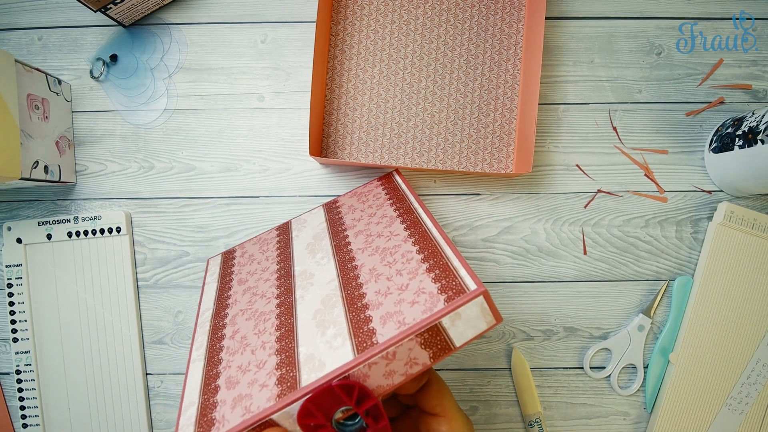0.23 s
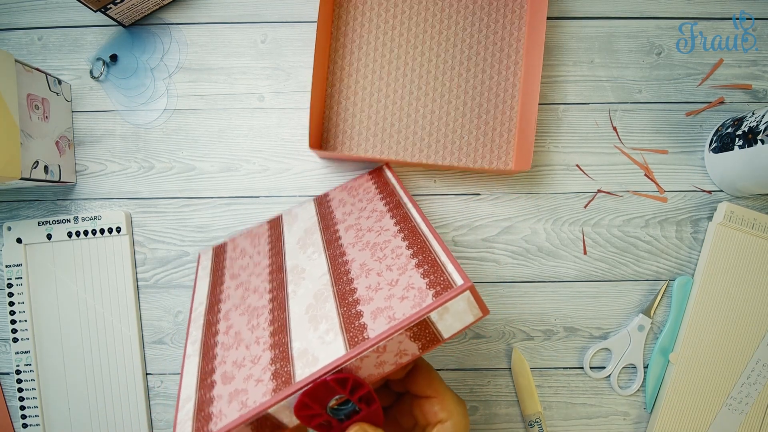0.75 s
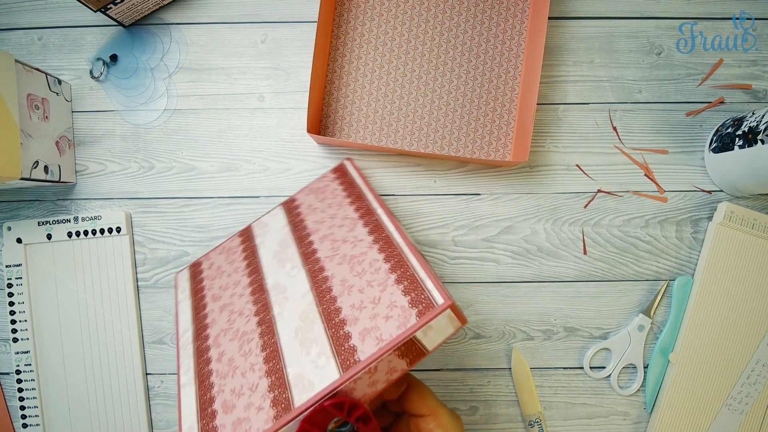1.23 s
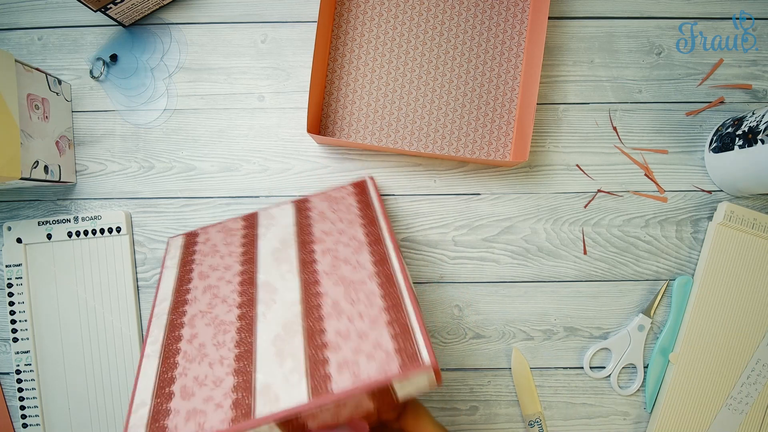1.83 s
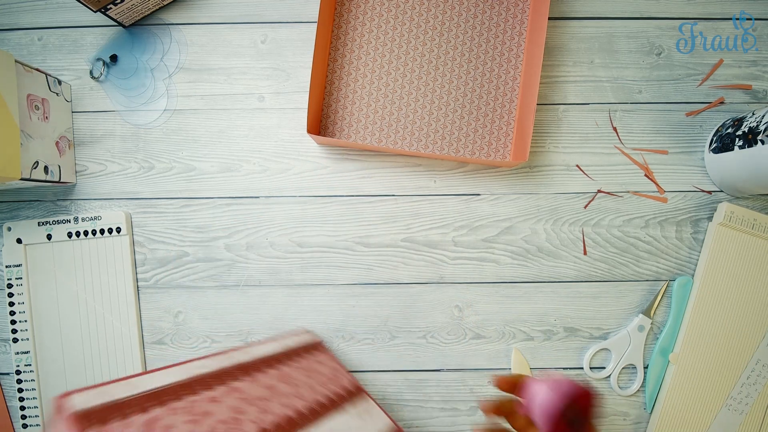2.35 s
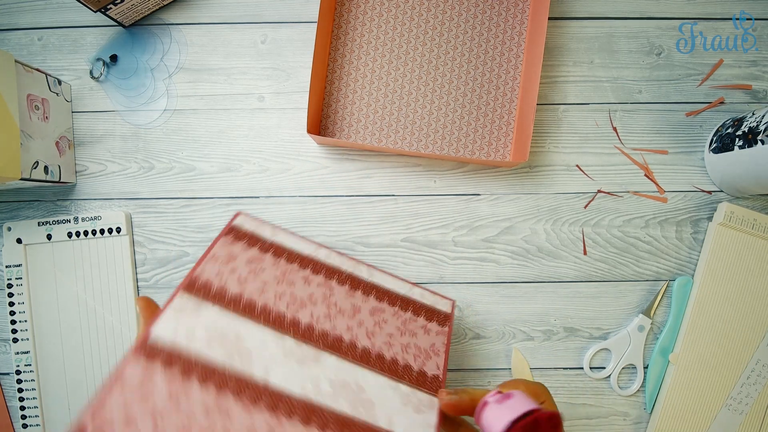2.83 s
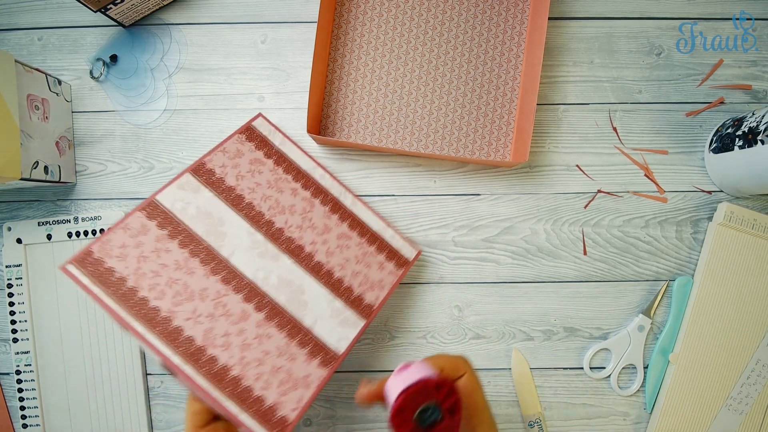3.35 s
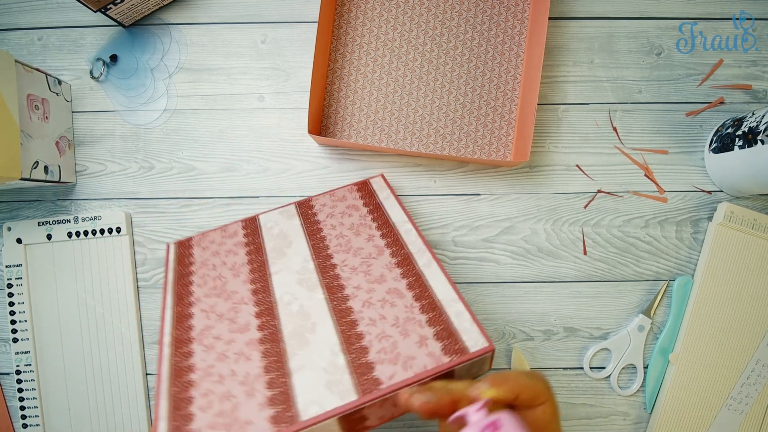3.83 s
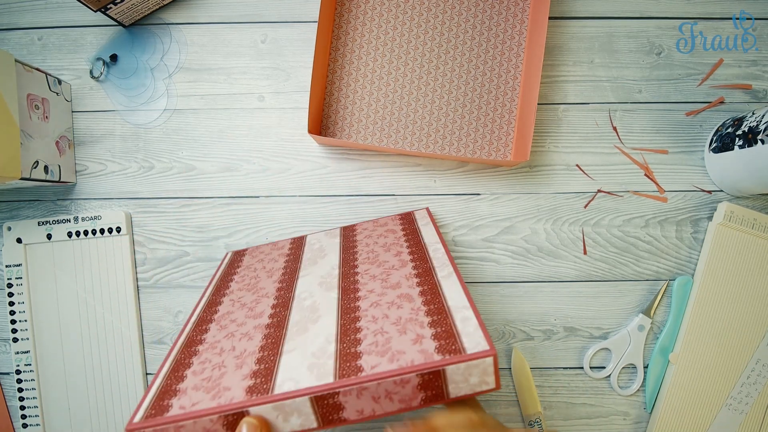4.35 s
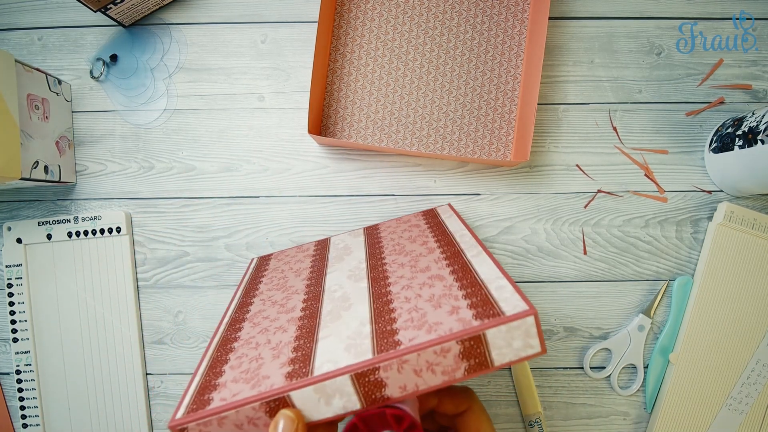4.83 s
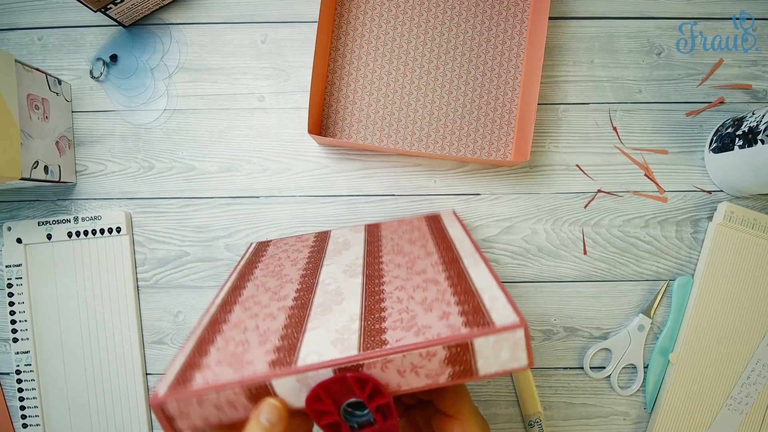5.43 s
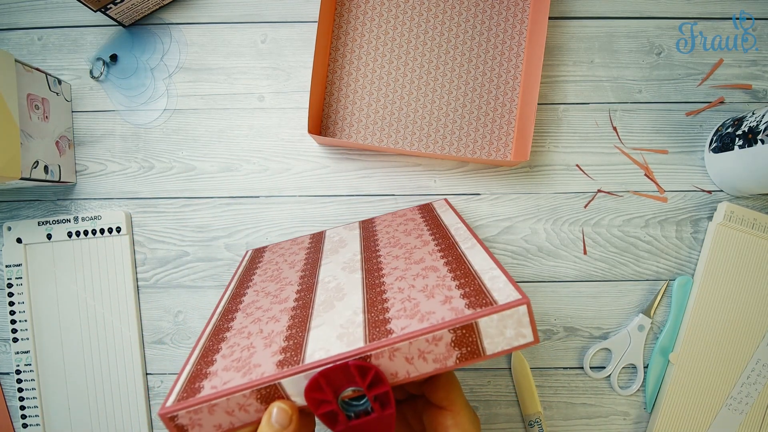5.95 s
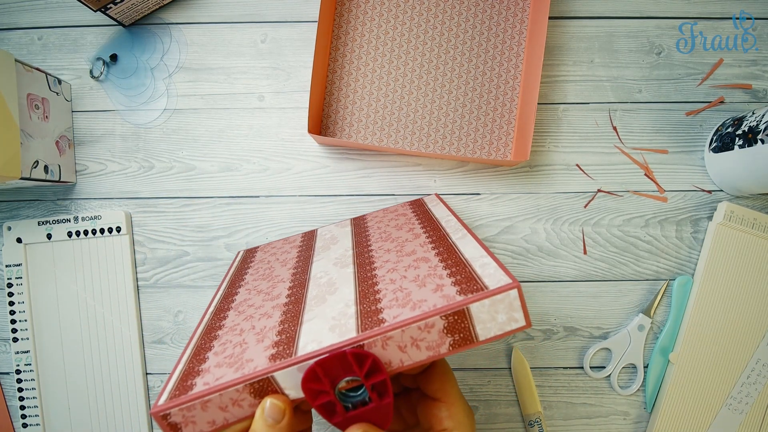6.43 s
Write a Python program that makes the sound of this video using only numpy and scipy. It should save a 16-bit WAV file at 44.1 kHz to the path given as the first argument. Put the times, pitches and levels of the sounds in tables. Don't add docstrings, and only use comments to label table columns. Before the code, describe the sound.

Close-up on a craft table: soft skin-on-card rubbing, a cluster of tiny dry plastic ticks from a hand punch, then one very loud, clipped snap. Afterwards a hollow card lid is rubbed, turned and knocked, busiest in the middle, then quieter handling. Small echoing room, faint air noise and distant traffic rumble; near-mono microphone.

```python
import sys
import numpy as np
from scipy import signal
from scipy.fft import rfft, irfft, next_fast_len
from scipy.io import wavfile

SR = 44100
rng = np.random.default_rng(int(sys.argv[2]) if len(sys.argv) > 2 else 0)


def volts(x):
    e = np.asarray(x, float) / 20
    return 10 ** e


def materialize(psi):
    bounded = np.clip(np.atleast_2d(psi).T, -1, 1)
    quanta = np.round(bounded * 32767).astype(np.int16)
    wavfile.write(sys.argv[1], SR, quanta)


N = 294777

# t/s, level/dB, crack level/dB, loudest pitch f/Hz
SNAP_JOLTS = [
    (1.3402, 2.5, -22, 4500),
    (1.3416, 4.5, -16, 1540),
    (1.3422, 5, -7, 2910),
    (1.3442, 8, -7.5, 2170),
]
# f/Hz, level/dB, time to fall 60 dB/s
DIE_MODES = [(1545, 4.5, 0.012), (1840, -11, 0.004), (2176, 2.5, 0.012), (2910, -2.5, 0.007),
             (3860, -17, 0.0042), (4537, -8, 0.013)]
# f/Hz, level per Hz/dB
TEAR_SPECTRUM = [(1200, -29), (2900, -0.5), (4500, -1), (6000, -4.5), (8500, -12.5), (13500, -19),
                 (16000, -27.5)]
# f/Hz, level per Hz/dB
SNAP_ALL_ROUND = [(300, -20.5), (1000, -7.5), (1600, -8), (2200, -1.5), (2600, -11.5), (3500, -13),
                  (4100, -6), (5200, -18.5), (10000, -22), (16000, -31)]
# t/s, peak level/dB, crack level/dB, upper modes level/dB
LEVER_TICKS = [(0.317, -30, -14, -5), (0.3231, -26, -15, -11), (0.3548, -26.5, -25, -22),
               (0.375, -28, -30, -11.5), (0.403, -21, -25.5, -8), (0.5436, -28.5, -18, -16),
               (0.5598, -28.5, -19.5, -17), (0.598, -28, -18.5, -17.5), (0.623, -24.5, -20.5, -24),
               (0.6413, -29, -19, -22), (0.6565, -30, -21, -20), (0.6747, -28.5, -18.5, -12),
               (0.693, -31, -14, -20), (0.7071, -23.5, -18.5, -17), (1.7881, -19, -22.5, -11),
               (2.328, -35.5, -23, -27), (6.6175, -40.5, -19, -9), (6.6295, -25, -16.5, 0.5)]
# f/Hz, level/dB, time to fall 60 dB/s
LEVER_MODES = [(1137, -16, 0.014), (1800, -1.5, 0.014), (2250, 3.5, 0.0079), (2630, 0, 0.0037),
               (3480, -8.5, 0.015), (3720, -10, 0.014)]
# f/Hz, level per Hz/dB
CLICK_SPECTRUM = [(1200, -41), (2500, 0), (4500, -2.5), (7000, -6), (10000, -13), (14000, -18.5),
                  (16000, -25.5)]
# t/s, level/dB
SPRING_LOUDNESS = [(6.562, -95.5), (6.566, -52), (6.575, -51.5), (6.583, -72), (6.59, -64), (6.603, -65.5),
                   (6.612, -65), (6.62, -90)]
# f/Hz, level/dB
SPRING_TONES = [(1900, -4), (2400, 0), (4300, -2), (5950, -8)]

# f/Hz, width/Hz, level/dB
BODY_MODES = [(329.4, 21, -1.5), (409, 43, 4), (483, 79, 1), (572, 49, 3), (703, 75, -3.5)]
# f/Hz, width/Hz, level/dB
WALL_MODES = [(912, 130, 0), (1138, 86, 2), (1360, 160, -2), (1730, 160, -10), (2010, 140, -14)]
# f/Hz, width/Hz, level/dB
SCRAPE_MODES = [(2142, 680, -6.5), (2982, 410, -1.5), (3362, 615, 0.5), (4020, 1540, -5), (4797, 560, -6.5)]
# f/Hz, width/Hz, level/dB
HISS_MODES = [(5340, 650, 5), (6400, 2100, 2), (8580, 2200, -1.5), (11500, 2900, -8), (14800, 2700, -14)]
# peak t/s, rise/s, fall/s, level/dB, dryness (card edge over hollow body)/dB
LID_STROKES = [(0, 0.057, 0.059, -46, -11), (.316, 0.004, 0.13, -50, 5),
               (0.479, 0.16, 0.022, -45.5, -5), (.56, 0.019, .2, -71, -3), (.64, 0.15, 0.45, -47, -1),
               (.86, 0.06, 0.21, -30, -6.5), (.925, 0.092, 0.073, -29, -13.5),
               (1.142, 0.06, 0.082, -32.5, -4), (1.33, 0.11, 1, -40.5, 0), (1.6, 0.16, 0.065, -40, 1.5),
               (1.801, 0.017, 0.18, -33.5, -1), (1.87, 0.15, 0.1, -33, -7),
               (1.975, 0.023, 0.078, -25, -5.5), (2.005, 0.041, 0.14, -33.5, -2),
               (4.085, 0.033, 0.099, -54, 9), (4.83, 0.034, 0.029, -55, 7), (4.3, 0.033, 0.049, -54, 9),
               (2.144, 0.01, 0.047, -48, 10.5), (2.188, 0.1, 0.095, -36, 4.5),
               (2.33, 0.15, 0.35, -64.5, 4), (1.049, 0.091, 0.19, -31.5, -10.5),
               (5.35, 0.1, 0.5, -53, 0), (5.568, 0.13, 0.22, -47.5, -2), (5.87, 0.088, 0.32, -52.5, -7),
               (6.34, 0.16, 0.097, -55, -8), (6.44, 0.034, 0.026, -56.5, -10),
               (6.57, 0.016, 0.047, -63.5, 6), (6.626, 0.025, 0.26, -70.5, 17)]
# peak t/s, rise/s, fall/s, level/dB, dryness/dB
MORE_STROKES = [(2.636, 0.013, 0.12, -52, 1.5), (2.7, 0.13, 0.074, -50, 1), (2.87, 0.028, 0.14, -42, 0),
                (2.99, 0.22, 0.25, -42, -2), (3.068, 0.088, 0.036, -22, -12.5),
                (3.15, 0.15, 0.13, -41.5, -6.5), (3.239, 0.0266, 0.062, -24, -11.5),
                (3.34, 0.07, 0.13, -32, -2), (3.47, 0.053, 0.19, -40.5, -2.5),
                (3.62, 0.011, 0.19, -34.5, -17.5), (3.85, 0.7, 0.26, -44, -4),
                (4.092, 0.042, 0.058, -30, -20), (4.268, 0.017, 0.03, -22.5, -21.5),
                (4.3, 0.045, .2, -40, -16), (4.4, 0.032, 0.13, -33, -10),
                (4.446, 0.24, 0.042, -38, -4.5), (4.6, 0.16, 0.85, -42.5, -8.5),
                (4.83, 0.39, 0.45, -52.5, -3.5), (5.03, 0.069, .1, -48.5, -3),
                (2.852, 0.0025, 0.037, -47, -0.5), (5.16, 0.047, 0.077, -37.5, -10.5),
                (5.316, 0.085, 0.023, -44, -8.5), (5.63, 0.033, 0.17, -44, -21),
                (5.72, 0.043, 0.033, -52, -3), (5.79, 0.059, 0.065, -52.5, -7)]
# level/dB, share of its dryness
LAYER_ANSWER = [(-0.5, 0.051), (1, 0.55), (1.5, 1.02), (-8, 1.22)]
# t/s, level toward the low wall mode and away from the high one/dB
HAND_GRIP = [(0, -2.5), (2.7, -0.5), (3.0, 1), (3.4, 5.5), (3.5, 9), (3.95, -1.5), (4.2, -1), (5.2, -5),
             (5.95, -5), (6.02, -2), (6.13, -15), (6.18, -7.5)]
# t/s, level/dB
PALM_DAMPING = [(.8, -8.5), (2.0, -5), (2.15, 1), (4.3, -1), (4.45, -5.5), (4.8, -4), (5.25, -1.5)]
# t/s, level/dB
FREE_FLAP = [(0, -2.5), (1.7, 2.5), (1.95, -5), (2.5, -3), (2.8, 4.5), (3.4, 1), (3.95, 5), (4.15, -7.5),
             (4.85, -1), (5.1, 3), (6, -1.5)]

# peak t/s, rise/s, fall/s, level/dB, f/Hz
EARLY_CATCHES = [(.86, 0.026, 0.056, -45.5, 3340), (0.934, 0.047, 0.053, -40, 1470),
                 (1.088, .005, .012, -40.5, 2150), (1.13, .015, 0.024, -43, 3470),
                 (1.15, .006, 0.013, -41, 3320), (1.83, .03, 0.058, -45, 3370),
                 (1.975, .01, .07, -49, 3150), (2.08, 0.02, 0.04, -45, 3300),
                 (2.144, .006, 0.013, -41, 3350), (2.169, 0.011, 0.11, -38.5, 2730),
                 (2.184, 0.034, 0.041, -39, 3350), (2.19, .04, 0.05, -33.5, 1154),
                 (2.36, 0.0084, .03, -53.5, 2200), (2.875, 0.0086, 0.052, -39, 1305),
                 (3.225, .004, 0.015, -36.5, 4740), (3.261, 0.04, 0.06, -38.5, 1900),
                 (3.313, 0.007, .03, -38, 1580), (3.338, 0.025, 0.02, -33, 1820),
                 (3.485, .005, 0.011, -46, 1930), (3.511, .005, 0.014, -56, 2370),
                 (3.641, .004, .02, -45, 2340), (3.678, .004, 0.014, -38.5, 1690),
                 (3.767, .004, .02, -47, 2330), (3.893, .006, 0.024, -44, 1530)]
# peak t/s, rise/s, fall/s, level/dB, f/Hz
LATER_CATCHES = [(4.094, 0.014, 0.039, -50, 3237), (4.27, 0.019, 0.1, -48, 3000),
                 (4.425, 0.072, 0.084, -44, 3170), (4.629, 0.16, 0.072, -58, 3160),
                 (4.721, 0.11, 0.29, -53.5, 1180), (4.829, 0.09, 0.038, -53, 3250),
                 (5.049, 0.0065, 0.014, -43.5, 1170), (5.141, .01, .015, -51, 1120),
                 (5.155, 0.0031, 0.014, -38, 1185), (5.32, 0.022, 0.11, -54, 3480),
                 (5.492, 0.011, .04, -50, 1180), (5.55, 0.038, 0.05, -45, 570),
                 (5.567, .005, 0.016, -45, 1270), (5.623, 0.012, 0.042, -39.5, 1220),
                 (5.629, 0.017, 0.028, -47, 2040), (5.698, 0.013, .03, -44.5, 1170),
                 (5.722, .006, .02, -43, 1210), (5.775, 0.014, .04, -52, 1920),
                 (5.82, .005, 0.009, -44, 1210), (5.92, 0.026, .04, -60, 3220),
                 (5.949, 0.035, 0.032, -50, 1117)]
# peak t/s, rise/s, fall/s,
# level/dB, f/Hz
MORE_CATCHES = [(1.445, .06, .08, -49, 4100), (1.58, 0.03, 0.084, -38.5, 524),
                (1.609, .003, .004, -51, 12000), (1.897, .004, .01, -45, 6600),
                (2.09, 0.026, 0.069, -36, 571), (2.97, .04, 0.052, -43, 417),
                (3.05, 0.046, 0.058, -34, 1105), (3.225, 0.0047, 0.015, -26.5, 1460),
                (3.227, 0.004, 0.016, -23, 350), (3.39, 0.027, 0.025, -34, 884),
                (3.462, 0.0037, .012, -28, 886), (3.57, 0.045, 0.08, -49, 936),
                (3.821, 0.032, 0.094, -40, 393), (4.082, 0.014, .02, -54, 7500),
                (4.61, 0.063, 0.028, -40, 486), (5.431, 0.023, 0.015, -50, 1900),
                (5.6, 0.046, 0.075, -52, 1730), (5.97, 0.011, 0.012, -61, 3000),
                (6.07, 0.11, 0.096, -67, 2200), (6.33, .05, .04, -53.5, 1102),
                (6.35, 0.023, .02, -57.5, 2296), (6.44, 0.017, .012, -52.5, 1216),
                (1.358, .008, .05, -35, 4200), (1.42, 0.075, 0.15, -35.5, 2930),
                (3.064, 0.0066, 0.023, -25.5, 436), (4.252, .003, 0.0075, -34, 3800),
                (4.264, 0.0042, 0.019, -42, 3700), (5.05, 0.06, 0.034, -61, 3970),
                (5.38, 0.17, 0.14, -56, 2320), (5.71, 0.019, 0.027, -48.5, 1800),
                (5.85, 0.0039, 0.022, -41.5, 523), (3.7, .1, 0.11, -49, 332), (.63, .09, .14, -53.5, 3720),
                (4.272, .012, 0.011, -30, 1230), (1.41, 0.055, .08, -36.5, 2190),
                (3.612, .006, 0.011, -35, 326), (3.74, 0.023, 0.053, -39, 346), (1.39, .03, .04, -31, 493),
                (1.341, .003, 0.0016, -14.5, 1527), (1.12, .02, 0.069, -46.5, 5600),
                (3.335, .03, .02, -41, 4460)]

# t/s, peak level/dB, loudest pitch f/Hz, crack level/dB
LID_KNOCKS = [(1.724, -31.5, 425, -47), (2.534, -35, 452, -53), (2.648, -26.5, 218, -48.5),
              (2.791, -34, 401, -67.5), (2.849, -39, 1210, -45), (2.871, -22.5, 880, -37),
              (2.965, -31, 440, -41.5), (3.061, -14, 378, -52), (3.136, -28, 406, -39),
              (3.172, -37.5, 393, -38.5), (3.222, -5.5, 308, -28.5), (3.245, -21.5, 342, -53),
              (3.46, -19.5, 760, -37), (3.623, -27, 902, -62), (3.801, -24.5, 390, -45),
              (4.049, -36.5, 940, -55), (4.095, -23.5, 510, -43), (4.4753, -28, 343, -39.5),
              (4.96, -34.5, 473, -49), (5.153, -33, 347, -55), (5.256, -31, 1240, -43.5),
              (5.302, -27.5, 605, -44), (5.411, -34.5, 1380, -46), (5.718, -42, 1220, -55),
              (5.775, -38.5, 1220, -55), (5.843, -35.5, 528, -52), (5.9, -39, 453, -56),
              (6.439, -51, 1230, -61.5)]
# t/s, peak level/dB, loudest pitch f/Hz, crack level/dB
PANEL_POPS = [(0.842, -21.5, 523, -46), (1.149, -12, 565, -51.5), (1.206, -19, 494, -54),
              (1.551, -23, 463, -43), (1.664, -21.5, 1460, -54), (1.8, -12.5, 562, -36.5),
              (1.892, -13.5, 564, -34.5), (1.895, -9.5, 1040, -47), (3.014, -20, 1170, -39),
              (3.35, -8, 630, -29.5), (3.509, -20, 850, -37.5), (3.637, -17, 920, -43),
              (3.678, -17, 292, -43), (3.707, -21.5, 360, -61), (3.877, -22.5, 330, -50),
              (4.251, -5, 1106, -32), (4.381, -32, 537, -51), (5.569, -30, 575, -51),
              (5.629, -33.5, 1260, -58)]
# f/Hz, level/dB, time to fall 60 dB/s
LID_MODES = [(210.4, -7.5, 0.048), (250.2, 1, 0.018), (357.3, -0.5, 0.041), (452, -1.5, 0.05),
             (565, -5, 0.059), (670, -0.5, 0.0067), (806, 1, .02), (920, -3, 0.0052), (1105, 0, 0.017),
             (1258, -5, 0.021), (1460, -6, 0.012), (1850, 4.5, 0.01)]
# t/s, level/dB
TABLE_THUMPS = [(1.148, -35), (1.55, -57), (1.801, -35), (1.895, -31), (2.645, -33), (3.06, -30),
                (3.134, -32), (3.174, -40), (3.243, -30), (3.349, -36), (3.455, -31.5), (3.8, -38),
                (3.879, -34.5), (4.252, -29.5), (4.477, -50), (5.846, -49)]
# f/Hz, level per Hz/dB
EDGE_SPECTRUM = [(1500, 1), (2800, 1), (4000, -1.5), (5500, -12), (9000, -19.5), (16000, -34.5)]

# f/Hz, time to fall 60 dB/s, level/dB
ROOM_ECHO = [(150, 0.45, 3), (500, 0.2, 1.5), (1454, 0.42, 0), (3000, 0.44, 3.5), (6000, 0.29, -1.5),
             (13900, 0.4, 5)]
# t/s, level/dB
TRAFFIC_LOUDNESS = [(0.0, -50), (0.54, -44.5), (1.19, -45.5), (1.38, -52), (1.97, -45), (2.311, -52),
                    (3.1, -49), (3.27, -49), (3.66, -54.5), (4.322, -48), (4.43, -55), (4.8, -54),
                    (5.671, -50.5), (6.68, -56)]
# f/Hz, level per Hz/dB
TRAFFIC_SPECTRUM = [(25, -37), (45, 1.5), (70, 3), (140, 1), (200, -4), (260, -27), (400, -58.5)]
# f/Hz, level per Hz/dB
AIR_SPECTRUM = [(110, -16.5), (180, -4.5), (248, -6.5), (277, -9.5), (340, -6), (586, -24), (668, -18),
                (1910, -28), (2100, -29.5), (2620, -29.5), (5980, -34), (13600, -34.5), (15800, -37.5)]
# f/Hz, level per Hz/dB
APART_SPECTRUM = [(12, -27.5), (20, 2.5), (68, -5.5), (694, -14.5), (1180, -17), (3230, -16.5), (6130, -16),
                  (15800, -18.5)]

STROKE_SPAN_DB = 20
STROKE_ROUNDNESS = 1.3


def rms_one(x):
    return x / np.sqrt(np.mean(x ** 2) + 1e-20)


def at_hz(points, hz, order=1):
    table = np.array(points)
    return np.interp(np.log(np.maximum(hz, 1)), np.log(table[:, 0]), table[:, order])


def over_time(points, **ends):
    return np.interp(np.arange(N) / SR, *np.transpose(points), **ends)


def coloured(spectrum):
    size = next_fast_len(N)
    white = rfft(rng.standard_normal(N), size)
    shape = volts(at_hz(spectrum, np.fft.rfftfreq(size, 1 / SR)))
    return rms_one(irfft(white * shape, size)[:N])


def drift(rate):
    r = np.exp(-2 * np.pi * rate / SR)
    return rms_one(signal.lfilter([1], [1, -2 * r, r * r], rng.standard_normal(N)))


def ring(clicks, hz, t60):
    r = volts(-60 / (t60 * SR))
    w = 2 * np.pi * hz / SR
    return signal.lfilter([0, np.sin(w)], [1, -2 * r * np.cos(w), r * r], clicks + 1e-18)


def strike(times, modes, strengths_db, contact_s):
    at = np.round(np.array(times) * SR).astype(int)
    out = np.zeros(N)
    for (hz, level_db, t60), blow_db in zip(modes, np.transpose(strengths_db)):
        clicks = np.zeros(N)
        clicks[at] = volts(level_db + blow_db) * rng.choice([-1, 1], len(at))
        pushed = ring(clicks, hz, contact_s * 7)
        out += ring(pushed, hz, t60) * 2 / (contact_s * SR)
    return out


def cracks(times, levels_db, dies_s, spectrum):
    clicks = np.zeros(N)
    clicks[np.round(np.array(times) * SR).astype(int)] = volts(levels_db)
    r = np.exp(-1 / (dies_s * SR))
    envelope = signal.lfilter([(1 - r) * np.e], [1, -2 * r, r * r], clicks + 1e-18)
    return envelope * coloured(spectrum)


def snap():
    s, level_db, crack_db, pitch_hz = np.transpose(SNAP_JOLTS)[:, :, None]
    times = s[:, 0]
    upper_lid = LID_MODES[3:]
    lid_db = np.repeat(crack_db - 26, len(upper_lid), axis=1)
    lid = strike(times, upper_lid, lid_db, contact_s=0.00065)
    octaves = np.abs(np.log2(np.array(DIE_MODES)[:, 0] / pitch_hz))
    die = strike(times, DIE_MODES, level_db - 24 * octaves, contact_s=0.001)
    tear = cracks(times, crack_db[:, 0], dies_s=0.00076, spectrum=TEAR_SPECTRUM)
    return die + tear + lid


def snap_toward_walls():
    hz = np.fft.rfftfreq(N, 1 / SR)
    last_jolt_s = np.array(SNAP_JOLTS)[-1, 0]
    return irfft(volts(at_hz(SNAP_ALL_ROUND, hz) + 39.0) * np.exp(-2j * np.pi * hz * last_jolt_s), N)


def lever():
    s, peak_db, bright_db, upper_db = np.transpose(LEVER_TICKS)
    is_upper = np.array(LEVER_MODES)[:, 0] > 2700
    strengths_db = peak_db[:, None] - 3.5 + is_upper * (upper_db[:, None] + 9)
    strengths_db = strengths_db + 1.3 * rng.standard_normal((len(s), len(LEVER_MODES)))
    ticks = strike(s, LEVER_MODES, strengths_db, contact_s=0.0004)
    ticks += cracks(s, peak_db + bright_db + 6.5, dies_s=0.0011, spectrum=CLICK_SPECTRUM)
    t = np.arange(N) / SR
    tones = sum(volts(level_db + 3.1 * drift(60)) * np.sin(2 * np.pi * hz * t) for hz, level_db in SPRING_TONES)
    return ticks + tones * volts(over_time(SPRING_LOUDNESS, left=-200, right=-200))


def strokes():
    s, rise_s, fall_s, level_db, dry_db = np.transpose(LID_STROKES + MORE_STROKES)[:, :, None]
    coarse_t = np.arange(0, N / SR + .002, .001)
    away = np.maximum((s - coarse_t) / rise_s, (coarse_t - s) / fall_s)
    shape_db = level_db - STROKE_SPAN_DB * away ** STROKE_ROUNDNESS
    curves = []
    for add_db, share in LAYER_ANSWER:
        power = np.sum(volts(shape_db + add_db + share * dry_db) ** 2, axis=0)
        curves.append(np.interp(np.arange(N) / SR, coarse_t, 10 * np.log10(power + 1e-12)))
    return curves


def rubbing():
    clump, out = drift(30), np.zeros(N)
    grip_db, palm_db, flap_db = over_time(HAND_GRIP), over_time(PALM_DAMPING), over_time(FREE_FLAP)
    wall_leans = [0.94, -0.25, -0.56, -0.5, -1.4]
    layers = zip(strokes(), [BODY_MODES, WALL_MODES, SCRAPE_MODES, HISS_MODES],
                 [900, 2200, 9000, 16000],
                 [1.9, 1.2, 0.75, 2.2],
                 [2.1, 1.3, 1.3, 1.7])
    for level_db, modes, per_s, clump_db, wander_db in layers:
        happens = rng.random(N) < per_s / SR
        sizes = volts(3.4 * np.minimum(rng.exponential(1, N), 3))
        grains = happens * sizes * rng.choice([-1, 1], N)
        layer = np.zeros(N)
        for k, (hz, wide, top_db) in enumerate(modes):
            tone = rms_one(ring(grains, hz, np.log(1000) / np.pi / wide))
            tone = tone * volts(top_db + wander_db * drift(11.4)) * np.sqrt(wide) * (-1) ** k
            if modes is WALL_MODES:
                tone = tone * volts(wall_leans[k] * grip_db + palm_db)
            if 1500 < hz < 2500:
                tone = tone * volts(flap_db)
            layer += tone
        power = sum(wide * volts(top_db) ** 2 for hz, wide, top_db in modes)
        out += layer / np.sqrt(power) * volts(level_db + clump_db * clump - 0.5)
    return out


def catches():
    before = 8000
    out, t = np.zeros(N + SR), np.arange(-before, 12000) / SR
    for s, rise_s, fall_s, level_db, hz in EARLY_CATCHES + LATER_CATCHES + MORE_CATCHES:
        grains = rng.standard_normal(len(t)) * volts(2.5 * np.minimum(rng.exponential(1, len(t)), 3))
        tone = ring(ring(grains, hz, 36 / hz), hz, 6.8 / hz)
        swell = volts(-STROKE_SPAN_DB * np.maximum(-t / rise_s, t / fall_s) ** STROKE_ROUNDNESS)
        tone = tone * swell
        tone = tone * np.sqrt(np.sum(swell ** 2) / np.sum(tone ** 2))
        at = int(s * SR) - before
        out[at:at + len(t)] += tone * volts(level_db)
    return out[:N]


def knocks():
    s, peak_db, pitch_hz, crack_db = np.transpose(LID_KNOCKS + PANEL_POPS)[:, :, None]
    times = s[:, 0]
    fall_db = np.repeat([5, 31], [len(LID_KNOCKS), len(PANEL_POPS)])[:, None]
    octaves = np.abs(np.log2(np.array(LID_MODES)[:, 0] / pitch_hz))
    chance_db = 1.9 * rng.standard_normal(octaves.shape)
    lid = strike(times, LID_MODES, peak_db - 3 - fall_db * octaves + chance_db, contact_s=0.0016)
    lid = signal.sosfilt(signal.butter(2, 150, "high", fs=SR, output="sos"), lid)
    lands, thump_db = np.transpose(TABLE_THUMPS)
    table_modes = [(48.6, -5.0, 0.12), (73.6, -8.0, 0.16), (143, 0.0, 0.063)]   # f/Hz, level/dB, fall/s
    table = strike(lands, table_modes, np.repeat(thump_db[:, None] + 0.5, 3, axis=1), contact_s=0.0042)
    return lid + table + cracks(times, crack_db[:, 0] - 0.5, dies_s=0.0021, spectrum=EDGE_SPECTRUM)


def room(x):
    t, edges = np.arange(SR) / SR, 60 * 2 ** np.arange(0, 8.1, .5)
    echo = np.zeros(SR)
    for low, high in zip(edges, edges[1:]):
        band = signal.butter(2, [low, high], "band", fs=SR, output="sos")
        fade_db = at_hz(ROOM_ECHO, low, order=2) - 60 * t / at_hz(ROOM_ECHO, low)
        echo += signal.sosfilt(band, rng.standard_normal(SR)) * volts(fade_db)
    first_wall_s, build_up_s = 0.00097, 0.0034
    echo *= np.clip((t - first_wall_s) / build_up_s, 0, 1)
    return volts(-4.5) * signal.fftconvolve(x, echo / np.sqrt(np.sum(echo ** 2)))[:N]


def traffic():
    return volts(over_time(TRAFFIC_LOUDNESS) - 2.0) * coloured(TRAFFIC_SPECTRUM)


def scene():
    rub, lid, ticks, cut = rubbing(), knocks(), lever(), snap()
    to_walls = snap_toward_walls() + volts(-2.0) * lid + volts(-4.0) * ticks + volts(-7.0) * rub
    table = rub + lid + ticks + cut + room(to_walls)
    middle = table + catches() + traffic() + volts(-56) * coloured(AIR_SPECTRUM)
    apart = volts(-70) * coloured(APART_SPECTRUM)
    return middle + apart * np.array([[1], [-1]])


def low_pass(x):
    return signal.sosfilt(signal.butter(12, 15950, fs=SR, output="sos"), x)


def record(dry):
    limit_db, release_db_s, react_s = -9, 160, .003
    climb = release_db_s * np.arange(N) / SR
    over_db = np.maximum(20 * np.log10(np.abs(dry[0]) + 1e-9) - limit_db, 0)
    held_db = np.maximum(np.maximum.accumulate(over_db + climb) - climb, 0)
    r = np.exp(-1 / (react_s * SR))
    duck_db = signal.lfilter([(1 - r) ** 2], [1, -2 * r, r * r], held_db)
    mix = np.clip(dry * volts(-duck_db), -1, 1)
    return low_pass(mix)


dry = scene()
out = record(dry)
materialize(out)
```